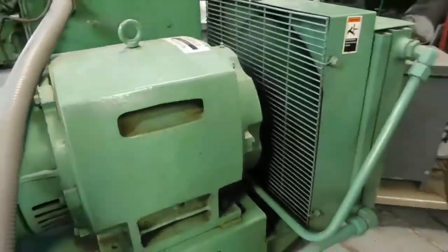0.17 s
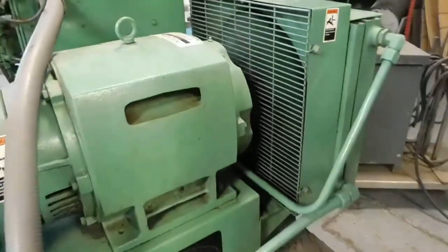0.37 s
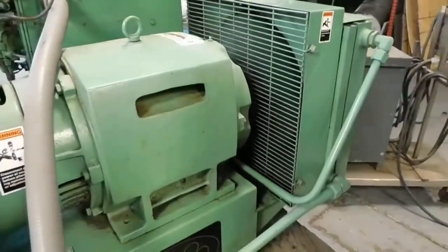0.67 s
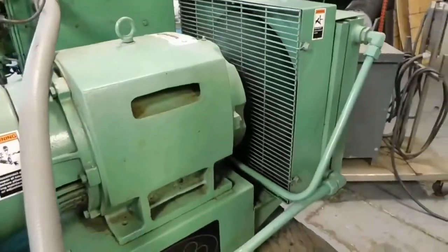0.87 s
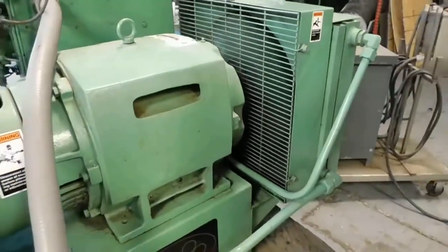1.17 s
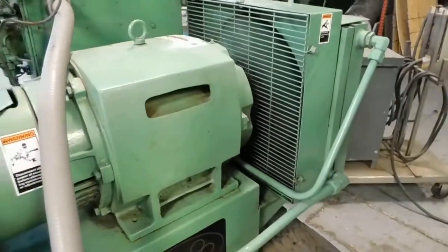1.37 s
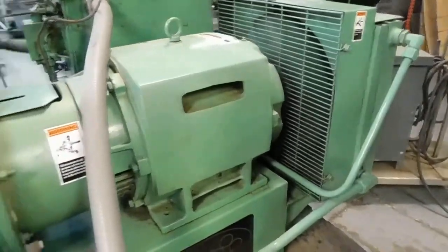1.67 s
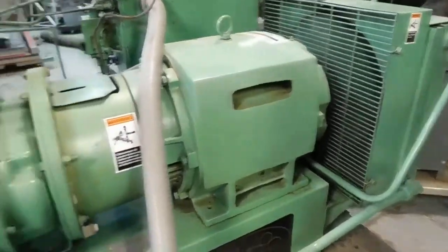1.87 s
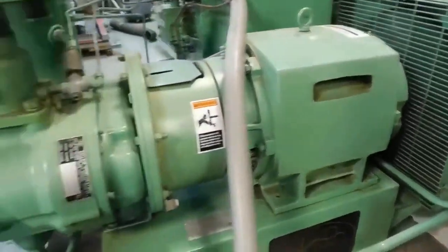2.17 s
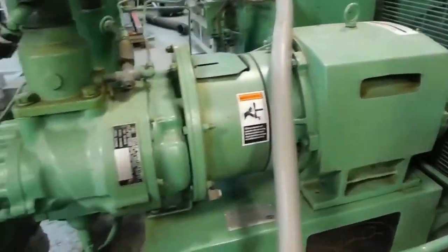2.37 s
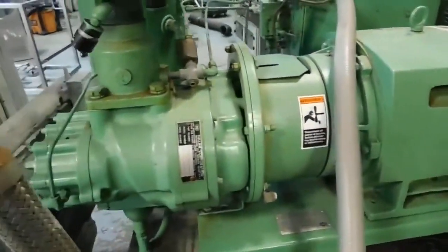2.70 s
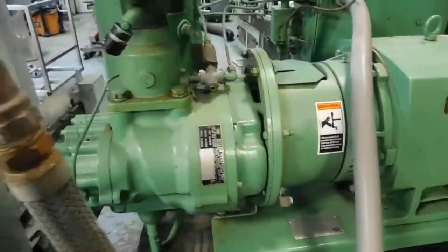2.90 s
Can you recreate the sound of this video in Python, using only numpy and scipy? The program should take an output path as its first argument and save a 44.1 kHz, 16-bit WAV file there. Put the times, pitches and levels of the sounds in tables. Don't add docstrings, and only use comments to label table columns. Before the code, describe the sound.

A large screw air compressor roars steadily up close under a piercing, wavering high whine.

```python
import sys
import numpy as np
from scipy import signal
from scipy.fft import rfft, irfft, next_fast_len
from scipy.io import wavfile
from scipy.ndimage import uniform_filter1d, map_coordinates

SR = 44100
rng = np.random.default_rng(int(sys.argv[2]) if len(sys.argv) > 2 else 0)


def waveform_to_disk(signal):
    frames = np.transpose(np.atleast_2d(signal))
    scaled = np.clip(frames, -1, 1) * 32767
    samples = np.round(scaled).astype(np.int16)
    wavfile.write(sys.argv[1], SR, samples)


def voltage_ratio(level):
    return 10 ** (np.asarray(level, float) / 20)


N = 134064
t = np.arange(N) / SR


def unit(x):
    return x / np.sqrt(np.mean(abs(x) ** 2) + 1e-20)


def along(points, hz):
    f, v = np.transpose(points)
    return np.interp(np.log(hz + 1), np.log(f + 1), v)


def curve(rows, column=1):
    columns = np.transpose(rows)
    return np.interp(t, columns[0], columns[column])


def wobble(rate):
    return map_coordinates(rng.standard_normal(400), [t * rate], mode="wrap")


def bump(centre_s, half_width_ms):
    return np.exp(-0.5 * ((t - centre_s) * 1000 / half_width_ms) ** 2)


def filtered(x, response):
    m = next_fast_len(N + 8192)
    return irfft(rfft(x, m) * response(np.fft.rfftfreq(m, 1 / SR)), m)[..., :N]


# (f/Hz, likeness 0-1)
PORT_LIKENESS = [(60, 0.2), (130, 0), (300, 1), (1400, 1), (4000, 0.31), (9000, 0.21), (15000, 0)]


def rush(gain, patchy_db):
    z = signal.stft(rng.standard_normal((2, N)), nperseg=512)[2]
    field = uniform_filter1d(rng.standard_normal(z.shape[1:]), size=5, axis=0)
    field = uniform_filter1d(field, size=12, axis=1)
    pair = signal.istft(z * voltage_ratio(patchy_db * unit(field)), nperseg=512)[1][:, :N]

    def mid_side(hz):
        angle = np.arccos(np.clip(along(PORT_LIKENESS, hz), -1, 1)) / 2
        return gain(hz) * [np.cos(angle), np.sin(angle)]

    def lag(hz):
        lag_s = 1e-4
        return np.exp(1j * np.pi * hz * lag_s * np.array([[1], [-1]]))

    mid, side = filtered(pair, mid_side)
    return unit(filtered(np.array([mid + side, mid - side]), lag))


# (f/Hz, level/dB per Hz)
HISS_SPECTRUM = [(6000, -23), (7300, 2), (8300, 3.5), (9400, 4), (10100, 1), (12300, -8.5), (15700, -13)]


def hiss():
    spectrum = [(2000, -90)] + HISS_SPECTRUM
    return voltage_ratio(-31.5 + 0.2 * wobble(5.16)) * rush(lambda hz: voltage_ratio(along(spectrum, hz)), patchy_db=2)


# (f/Hz, level/dB per Hz)
ROAR_SPECTRUM = [(25, -6), (150, -62.5), (450, -16), (900, 1.5), (2600, 4.5), (3600, 4), (6300, -1),
                 (7000, -6.5)]


def fan_roar():
    spectrum = ROAR_SPECTRUM + [(9000, -44)]
    roar = rush(lambda hz: voltage_ratio(along(spectrum, hz)), patchy_db=2.5)
    return voltage_ratio(-31 + 0.31 * wobble(3.24)) * roar * voltage_ratio([[-1], [1]])


# (t/s, centre f/Hz, level/dB)
CASING_WALK = [
    (0, 2800, -43),
    (1, 2650, -37),
    (1.4, 1860, -45.5),
    (2.2, 1730, -38),
    (3.04, 1620, -37.5),
]


def casing():
    centre_hz, band = curve(CASING_WALK), 0
    for panel_hz in (1400, 2000, 2700):
        nearness = np.exp(-((centre_hz - panel_hz) / 550) ** 2)
        band = band + nearness * rush(lambda hz: 1 / (1 + ((hz - panel_hz) / 260) ** 2), patchy_db=-0.5)
    return voltage_ratio(curve(CASING_WALK, column=2)) * band


# (multiple of the lobe rate, level/dB rms)
LOBE_TONES = [(1, -44), (2, -45.5), (3, -51.5), (5, -51.5), (7, -63)]


def lobes():
    lobe_hz, total = 301.7, 0
    for multiple, db in LOBE_TONES:
        ports = []
        for side_db in (-0.7, 0.7):
            level = voltage_ratio(db + 2 + side_db + 1.6 * wobble(8))
            ports.append(level * np.sin(2 * np.pi * multiple * lobe_hz * t + 0.083 * wobble(4.94)))
        total = total + np.array(ports)
    return total


PART_HZ = [1688, 2036, 7687, 7750, 8872, 9000, 9290, 9373, 9524, 9705, 12212, 15375]
# (width f/Hz, level/dB)
PART_RINGING = [(51, -39), (12.2, -41.5), (11.8, -36.5), (36, -38), (55, -42.5), (70.4, -41.5),
                (122, -35.5), (46.3, -34.5), (17.4, -46.5), (64.6, -35), (12, -63), (18.2, -50.5)]


def whistles():
    def resonances(f):
        total = 0
        for hz, (width, db) in zip(PART_HZ, PART_RINGING):
            total = total + voltage_ratio(db) / np.sqrt(width) / (1 + (2 * (f - hz) / width) ** 2)
        return total

    return voltage_ratio(-30) * rush(resonances, patchy_db=4.5)


# (t/s, half width/ms, part number in PART_HZ, level/dB)
PART_FLARES = [(.07, 35, 9, -30), (.15, 30, 7, -30), (.2, 30, 2, -30), (.3, 50, 7, -30), (.39, 30, 9, -30),
               (.97, 30, 9, -31), (1.28, 40, 9, -34), (1.85, 35, 8, -28), (1.95, 30, 8, -30),
               (2.07, 25, 9, -28), (2.53, 30, 7, -32)]


def flares():
    waver = 0.85 * np.array([wobble(30), wobble(30)])
    total = 0
    for s, ms, part, db in PART_FLARES:
        total = total + voltage_ratio(db) * bump(s, ms) * np.sin(2 * np.pi * PART_HZ[part] * t + waver)
    return voltage_ratio(-1) * total


# (t/s, half width/ms, peak level/dB)
LEFT_SWELLS = [(0.045, 18, -34.8), (0.127, 27, -26.8), (0.289, 38, -31.0), (0.422, 18, -15.9),
               (0.478, 17, -18.6), (0.696, 12, -19.8), (0.703, 87, -26.4), (0.882, 32, -19.5),
               (1.084, 79, -25.8), (1.293, 18, -35.3), (1.442, 33, -23.4), (1.56, 14, -23.5),
               (1.68, 40, -22.0), (1.739, 10, -23.7), (1.842, 19, -28.3), (1.979, 27, -26.2),
               (2.139, 42, -20.2), (2.354, 14, -22.7), (2.356, 86, -24.5), (2.454, 23, -22.5),
               (2.583, 19, -18.1), (2.658, 24, -26.0), (2.74, 18, -19.3), (2.818, 32, -15.5),
               (2.978, 17, -20.4), (3.039, 30, -28.0)]
# (t/s, half width/ms, peak level/dB)
RIGHT_SWELLS = [(-0.104, 90, -22.2), (0.144, 24, -22.9), (0.27, 37, -27.6), (0.454, 39, -16.2),
                (0.567, 16, -22.5), (0.651, 67, -22.9), (0.715, 20, -20.8), (0.862, 36, -28.1),
                (1.062, 63, -28.6), (1.166, 27, -20.7), (1.303, 34, -24.3), (1.428, 22, -19.4),
                (1.517, 62, -21.7), (1.681, 35, -24.4), (1.839, 14, -28.6), (1.941, 61, -35.4),
                (1.982, 15, -25.0), (2.115, 24, -13.8), (2.303, 84, -33.4), (2.407, 41, -24.2),
                (2.59, 35, -26.8), (2.738, 20, -29.5), (2.815, 22, -20.4), (2.819, 97, -35.3),
                (2.983, 19, -20.1), (3.086, 26, -14.4)]
# (t/s, phase/rad)
LEFT_LEAD = [(0, 1.7), (.6, 1.15), (1.1, 0.23), (1.65, 1.34), (2.2, 0.5), (3.04, -1.83)]


def whine():
    whine_hz, rest_db, middle_db, contrast = 9198, -33.5, -24, 1.357
    phase = 2 * np.pi * whine_hz * t + 1.093 * wobble(14)
    ports = []
    for swells, half in ((LEFT_SWELLS, 0.5), (RIGHT_SWELLS, -0.5)):
        swell = voltage_ratio(rest_db) + sum(voltage_ratio(db) * bump(s, ms) for s, ms, db in swells)
        level = (swell / voltage_ratio(middle_db)) ** contrast * voltage_ratio(2.1 * wobble(60))
        ports.append(level * np.sin(phase + half * curve(LEFT_LEAD) + 0.2 * wobble(17)))
    return voltage_ratio(-25) * np.array(ports)


def scene():
    return hiss() + fan_roar() + casing() + lobes() + whistles() + flares() + whine()


def low_pass(x):
    return signal.sosfilt(signal.butter(12, 15750, fs=SR, output="sos"), x)


def record(dry):
    port_hz, port_width_hz, treble_hz = 9507, 1350, 2650
    bass_hz, top_hz = 73, 15750
    ceiling_db, lopsided, hardness, out_db = -19.5, 0.017, 1.72, 18.5

    def lift(hz):
        port = 1 + 1 / (1 + (2 * (hz - port_hz) / port_width_hz) ** 2)
        return np.hypot(1, hz / treble_hz) * port

    def equaliser(hz):
        band = hz / np.hypot(hz, bass_hz) * (hz < top_hz)
        return voltage_ratio(ceiling_db + out_db) / lift(hz) * band

    x = signal.resample_poly(filtered(dry, lift), up=2, down=1, axis=1) / voltage_ratio(ceiling_db) + lopsided
    x = x / (1 + abs(x) ** hardness) ** (1 / hardness)
    x = signal.resample_poly(x, up=1, down=2, axis=1)
    x = filtered(x - x.mean(axis=1, keepdims=True), equaliser)
    return low_pass(x)


dry = scene()
out = record(dry)
waveform_to_disk(out)
```